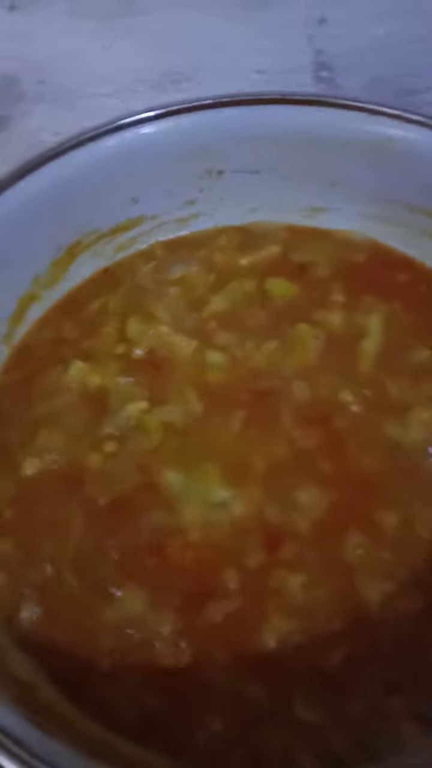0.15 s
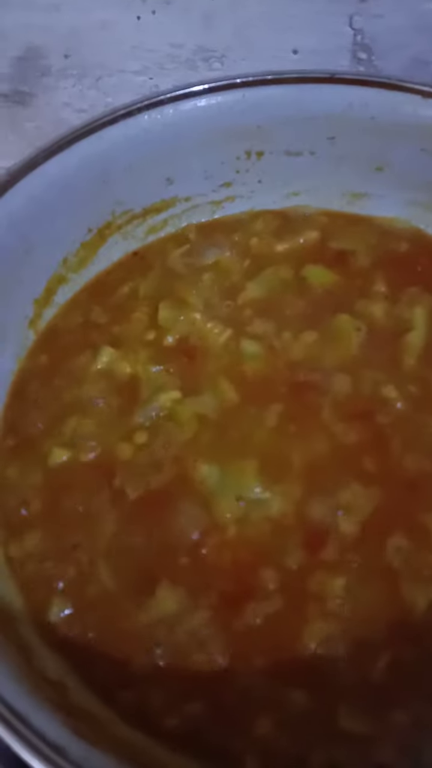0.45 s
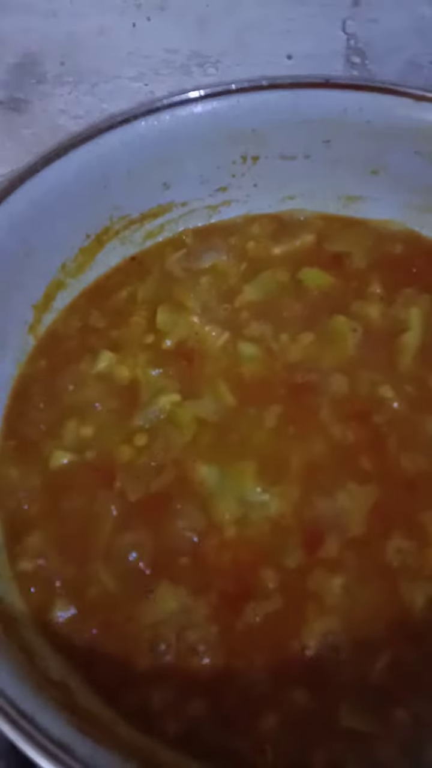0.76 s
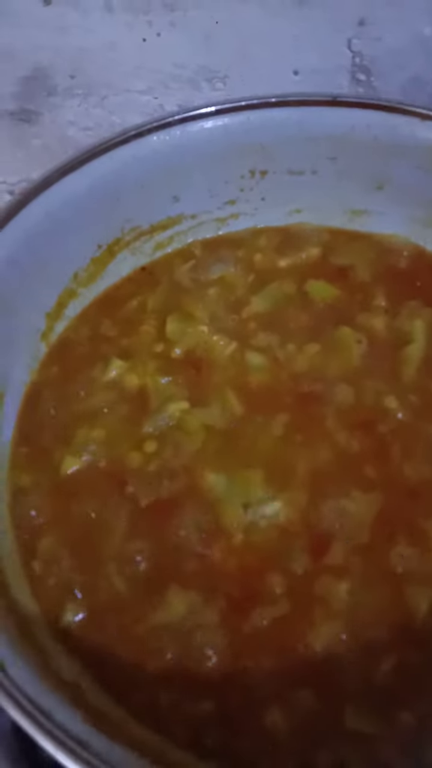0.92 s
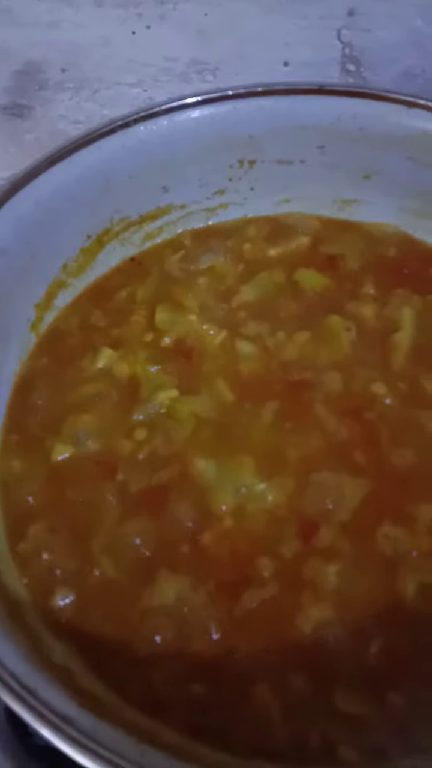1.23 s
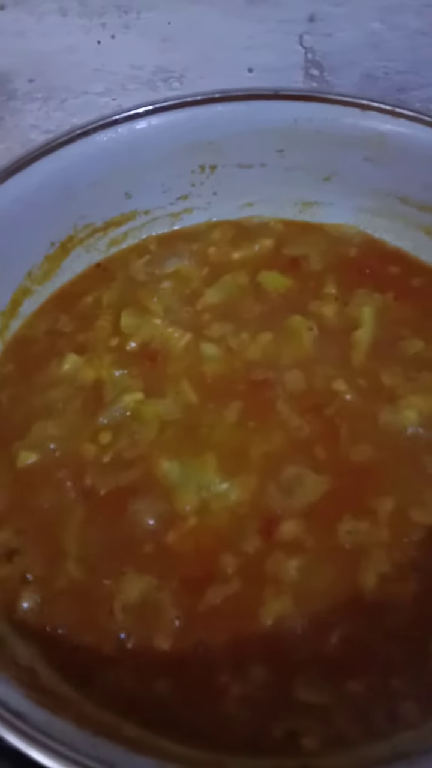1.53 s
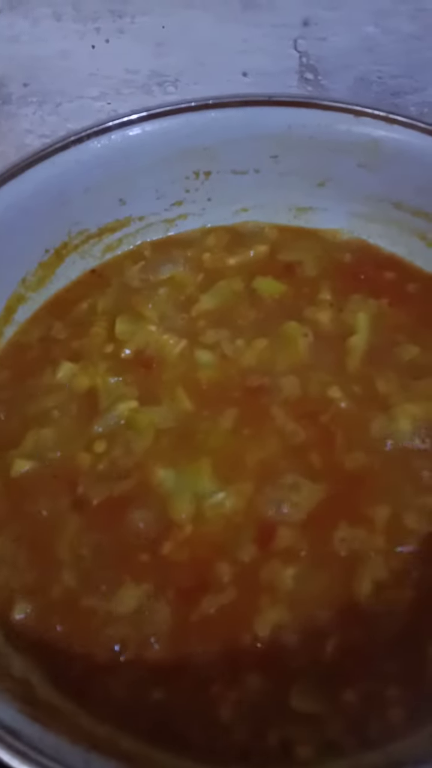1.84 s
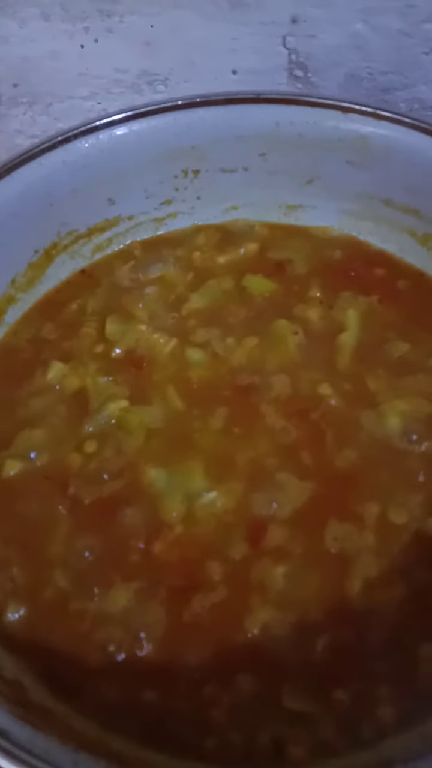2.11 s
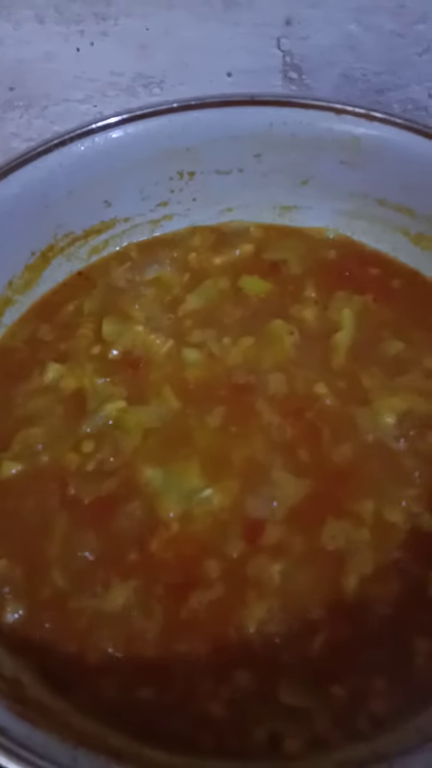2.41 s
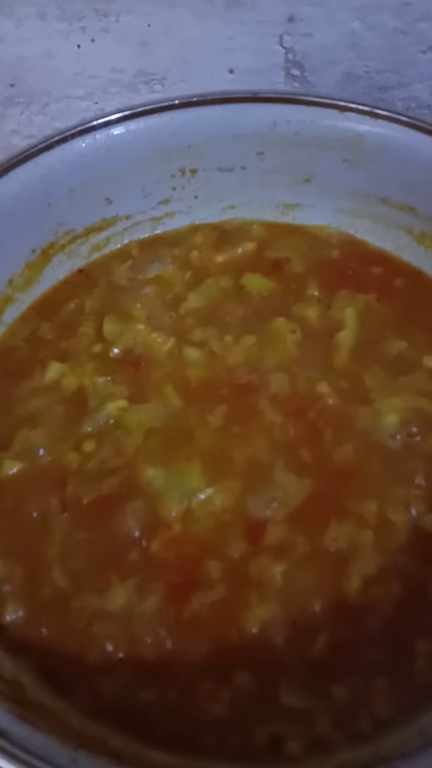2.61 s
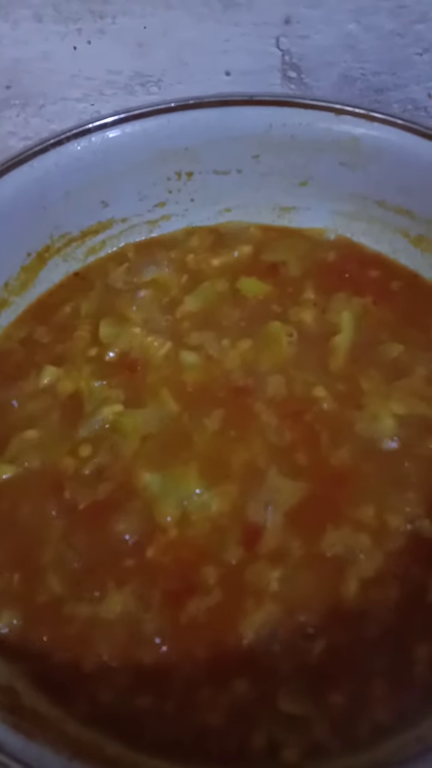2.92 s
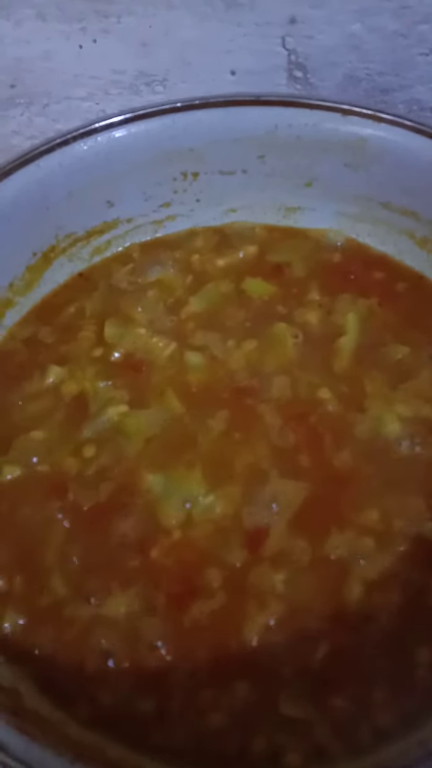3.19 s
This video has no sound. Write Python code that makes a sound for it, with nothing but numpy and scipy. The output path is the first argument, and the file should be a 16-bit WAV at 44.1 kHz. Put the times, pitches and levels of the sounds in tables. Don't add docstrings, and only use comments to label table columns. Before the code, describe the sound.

Thick curry simmers in a metal pan throughout, close to a small microphone. A steady, grainy, slightly ringing hiss sits over quiet flame and boiling rumble. Soft plops start at once; bubble pops cluster at 0.1-0.5 seconds, strongest near 0.3, then continue irregularly with deeper pops, steam spits and faint spray puffs. Tiny metal ticks come near 2.2, 2.3, 2.5 and 3.2, with thin rim squeaks around 2.2-2.5.

```python
import sys
import numpy as np
from scipy import signal
from scipy.fft import rfft, irfft, next_fast_len
from scipy.io import wavfile

SR = 44100
rng = np.random.default_rng(int(sys.argv[2]) if len(sys.argv) > 2 else 0)


def gain_from_decibels(decibels):
    exponent = np.asarray(decibels, float) / 20
    return 10 ** exponent


def store_wav(level_fs):
    pcm = np.round(np.clip(np.atleast_2d(level_fs), -1, 1) * 32767)
    wavfile.write(sys.argv[1], SR, pcm.T.astype(np.int16))


N = 147735

# [f/Hz, level per Hz/dB]
RUMBLE_COLOUR = [(26, -37), (45, 6), (129, -6.5), (183, -2.5), (253, -9.5), (348, -4), (900, -9.5),
                 (1050, -12), (1430, -27), (2420, -120)]
# [f/Hz, width/Hz, lift/dB]
HOLLOW_PEAKS = [(188.7, 20, 11), (232, 110, -4), (345, 34, 8), (398, 21, 5), (511, 23, 8), (650, 19.6, 10),
                (865, 360, 5)]
# [t/s, level/dB, f/Hz, length/s]
PLOPS = [(0.08, -62.5, 434, 0.058), (0.151, -57.5, 163, 0.03), (0.166, -49.5, 63, 0.063),
         (0.168, -62, 348, 0.038), (0.226, -63.0, 495.0, 0.033), (0.231, -58, 184, 0.059),
         (0.251, -58.5, 342, 0.093), (0.288, -59, 511, 0.025), (0.402, -63, 500.0, 0.033),
         (0.407, -60.5, 400.0, 0.025), (0.443, -62, 835, 0.03), (0.539, -64, 717, 0.032),
         (0.622, -56.5, 79.6, 0.056), (0.84, -59.5, 350.0, 0.035), (0.851, -62.5, 707, 0.065),
         (0.867, -62.0, 505, 0.1), (0.904, -67, 350.0, 0.022), (0.905, -56.5, 420, 0.033),
         (0.92, -65, 840, 0.04), (0.95, -62, 188, 0.056), (1.036, -64.0, 504, 0.051),
         (1.036, -56, 777, 0.022), (1.052, -58.5, 187, 0.063), (1.095, -57, 191, 0.019),
         (1.169, -54.5, 355, 0.027), (1.225, -57.0, 190, 0.073), (1.257, -57, 81.5, 0.071),
         (1.287, -67, 627, 0.11), (1.323, -60, 620, 0.028), (1.332, -67.5, 783, 0.073),
         (1.509, -61, 710, 0.033), (1.543, -58, 430, 0.033), (1.544, -55, 348, 0.025),
         (1.65, -67, 530, 0.058), (1.711, -67, 182, 0.038), (1.761, -64.0, 520.0, 0.046),
         (1.815, -60.5, 345.0, 0.046), (1.934, -60.5, 427, 0.041), (2.087, -57, 345.0, 0.05),
         (2.121, -63.5, 818, 0.087), (2.142, -63, 512, 0.04), (2.264, -64.0, 345.0, 0.06),
         (2.354, -58, 430.0, 0.033), (2.43, -65.5, 186, 0.059), (2.451, -63, 430.0, 0.029),
         (2.58, -61.5, 190, 0.055), (2.672, -55, 344, 0.049), (2.729, -66.0, 513, 0.064),
         (2.95, -68, 101, 0.025), (3.33, -61.5, 180, 0.032)]
# [t/s, peak level/dB, length/s]
SQUEAKS = [
    (2.2102, -47, 0.0033),
    (2.229, -51, .012),
    (2.296, -54, 0.004),
    (2.313, -45, .011),
    (2.478, -57, .012),
]
# [t/s, peak level/dB]
TICKS = [
    (2.215, -28.5),
    (2.309, -46),
    (2.4787, -52),
    (3.2379, -41.5),
]
# [f/Hz, level/dB, t60/s]
TICK_MODES = [(10050, -20, .025), (14210, -5, .03), (15350, -5, .02), (15700, -13, .02), (11400, -31, .02),
              (9300, -29, .03)]
# [t/s, peak level/dB, f/Hz]
POPS = [(0.1142, -28, 2470), (0.168, -38, 2530), (0.187, -27, 2430), (0.2144, -22.5, 2480),
        (0.2384, -38, 2460), (0.3186, -18, 2450), (0.431, -26, 2300), (0.4566, -23.5, 2440),
        (0.488, -28, 2600), (0.6928, -25.5, 2460), (0.889, -25, 2580), (0.928, -21.5, 2475),
        (1.0311, -27.5, 2400), (1.074, -30, 2386), (1.1536, -29, 2520), (1.2605, -28, 2530),
        (1.4553, -27, 2460), (1.506, -26.5, 2550), (1.5374, -29, 2240), (1.5832, -26.5, 2450),
        (1.66, -43, 2530), (1.733, -25, 2480), (1.8115, -27, 2350), (1.916, -27.5, 2390),
        (2.0094, -37, 2160), (2.0275, -30, 2320), (2.1212, -29, 2420), (2.1403, -26.5, 2510),
        (2.1814, -29.5, 2510), (2.2553, -27, 2380), (2.337, -30, 2500), (2.4855, -34, 2330),
        (2.5242, -29, 2440), (2.5963, -32.5, 2400), (2.72, -39, 2460), (2.7379, -24, 2450),
        (2.9367, -29, 2290), (3.053, -31, 2480), (3.079, -28.5, 2270), (3.1495, -26.5, 2530),
        (3.2266, -29, 2220), (3.3251, -29.5, 2536)]
# [t/s, peak level/dB, f/Hz]
DEEP_POPS = [(0.2432, -29.5, 1293), (0.342, -35.5, 1233), (0.833, -29.5, 1300), (0.9384, -31, 1273),
             (0.9604, -28.5, 1273), (1.1545, -30, 1280), (1.4225, -28.5, 1307), (1.5824, -30.5, 1270),
             (1.6995, -36, 1300), (2.1872, -34, 1270), (2.262, -36, 1270), (2.4036, -32, 1238),
             (2.4352, -35, 1300), (2.4837, -34, 1250), (2.833, -39, 1270), (2.922, -33.5, 1260),
             (3.0457, -31.5, 1338), (3.292, -40, 1250)]
# [t/s, peak level/dB, f/Hz]
CRACKLES = [
    (.0802, -44, 3540),
    (.3187, -38, 3220),
    (.328, -39, 3100),
]
# [t/s, pan level/dB, fizz level/dB]
HEAT = [
    (0.0, -39, -54),
    (0.45, -40.5, -52),
    (3.35, -41, -53),
]
# [t/s, level/dB]
FLURRIES = [(.116, -45.5), (.187, -43), (.24, -61), (0.388, -36.5), (.455, -40), (.49, -48), (.54, -43),
            (0.889, -42.5), (1.15, -60), (1.81, -41), (1.83, -52), (1.917, -39), (2.009, -38), (2.044, -45),
            (2.12, -45), (2.25, -48), (2.335, -40.5), (2.433, -40), (2.59, -43), (2.815, -42)]
# [t/s, peak level/dB]
SPITS = [(0.126, -40), (0.36, -40), (0.452, -33), (0.6688, -40.5), (0.8349, -39), (1.322, -42),
         (1.927, -40), (2.006, -40), (2.32, -40), (2.601, -39), (2.8902, -42)]
# [t/s, level/dB, length/s]
PUFFS = [
    (.462, -56, 0.022),
    (.63, -66, .015),
    (.745, -70, 0.028),
    (1.235, -67, .03),
    (1.535, -58, .03),
    (1.92, -59, 0.081),
    (3.27, -62, .02),
]
# [f/Hz, level per Hz/dB]
PAN_COLOUR = [(560, -53.5), (950, -40), (1100, -15), (1250, -5), (1730, -9.5), (2460, -1), (3050, -16.5),
              (3360, -25), (4000, -39.5), (5200, -64), (8800, -120)]
# [f/Hz, width/Hz, lift/dB]
PAN_PEAKS = [(1270, 150, 9.5), (1603, 15, 9), (1843, 63, 1.5), (1928, 200, 4.5), (2225, 38, 8),
             (2494, 155, 5.5), (3034, 152, 12), (3540, 49, 7)]
# [f/Hz, level per Hz/dB]
FIZZ_COLOUR = [(2180, -58), (3700, -23), (4670, -15), (5680, 0.5), (6570, 2.5), (7130, 4.5), (7600, -0.5),
               (9000, -19), (11000, -31), (14300, -64), (22000, -120)]
# [f/Hz, width/Hz, lift/dB]
FIZZ_PEAKS = [(4215, 110, 8), (5330, 300, 4), (6626, 130, -11), (10070, 61, 7.5)]
# [f/Hz, level per Hz/dB]
AIR_COLOUR = [(6180, -37), (10500, -29), (10900, -20), (13500, -21), (14900, -6.5), (15600, -6),
              (15900, -13)]
# [f/Hz, width/Hz, lift/dB]
AIR_PEAKS = [(14210, 120, 4), (15350, 150, 5), (15560, 60, -6), (10800, 600, -4)]

RUMBLE_DB, AIR_DB = -54, -71.5
PLOP_BEND_HZ_PER_S, PLOP_WOBBLE_DB, PLOP_WAVER_RAD = 350, 2.0, 0.6
SQUEAK_HZ = 15350
TICK_DELAY_S, TICK_CONTACT_S = 0.0003, 0.0009
POP_RISE_S, POP_FALL_CYCLES, POP_DB = 0.0015, 5.9, -4
POP_KNOCK_DB = -3
BURST_RISE_S, FLURRY_FALL_S = 0.003, 0.032
SPIT_FALL_S, SPIT_DB = 0.018, -7
LOW_CUT_HZ, HIGH_CUT_HZ = 79, 15680


def rms_one(x):
    return x / np.sqrt(np.mean(x ** 2) + 1e-20)


def drift(rate_hz):
    r = np.exp(-2 * np.pi * rate_hz / SR)
    slow = signal.lfilter([1], [1, -2 * r, r * r], rng.standard_normal(N + SR))
    return rms_one(slow[SR:])


def colour(x, spectrum, peaks):
    size = next_fast_len(N + SR // 2, real=True) // 2 * 2
    hz = np.maximum(np.arange(size // 2 + 1) * SR / size, 1)
    at, db = np.transpose(spectrum)
    db = np.interp(np.log(hz), np.log(at), db)
    outside = np.log(np.maximum(at[0] / hz, hz / at[-1]))
    db = db - 40 * np.clip(20 * outside, 0, 1)
    for peak_hz, width_hz, lift_db in peaks:
        db = db + lift_db / (1 + (2 * (hz - peak_hz) / width_hz) ** 2)
    gain = gain_from_decibels(db)
    cepstrum = irfft(np.log(gain / np.sqrt(np.mean(gain ** 2))), size)
    cepstrum[1:size // 2] *= 2
    cepstrum[size // 2 + 1:] = 0
    return irfft(rfft(x, size) * np.exp(rfft(cepstrum)), size)[:N]


def grains(rate, spread_db, share, flicker_db, flicker_hz):
    clumps = gain_from_decibels(flicker_db * drift(flicker_hz))
    sizes = gain_from_decibels(spread_db * np.minimum(rng.exponential(1, N), 5)) * rng.choice([-1, 1], N)
    clicks = rms_one(sizes * (rng.random(N) < rate / SR))
    smooth = rng.standard_normal(N)
    return rms_one(clumps * (share * clicks + np.sqrt(1 - share ** 2) * smooth))


def bubbles(rate, low_hz, high_hz, cycles, count):
    sizes = gain_from_decibels(2.56 * np.minimum(rng.exponential(1, N), 3)) * (rng.random(N) < rate / SR)
    dealt = rng.integers(0, count, N)
    out = 0
    for k, hz in enumerate(np.geomspace(low_hz, high_hz, count)):
        r, w = gain_from_decibels(-60 * hz / (cycles * SR)), 2 * np.pi * hz / SR
        pole = [1, 0, -1, 1, -2 * r * np.cos(w), r * r]
        ring = signal.sosfilt([pole, pole], sizes * (dealt == k) + 1e-18)
        out = out + np.sqrt(hz) * rms_one(ring)
    return rms_one(out) * np.sqrt(2 * (high_hz - low_hz) / SR)


def strikes(s, db):
    out = np.zeros(N)
    out[(np.asarray(s) * SR).astype(int)] = gain_from_decibels(db)
    return out


def swells(rows):
    t = np.arange(N) / SR
    return [gain_from_decibels(db) * np.exp(-(2 * (t - s) / length) ** 2) for s, db, length in rows]


def bursts(s, db, fall_s):
    rise, fall = np.exp(-1 / (BURST_RISE_S * SR)), np.exp(-1 / (fall_s * SR))
    stages = [[1, 0, 0, 1, -fall, 0], [1 - rise, 0, 0, 1, -rise, 0]]
    return signal.sosfilt(stages, strikes(s, db) + 1e-18)


def rumble():
    lumps = gain_from_decibels(-3.0) * grains(120, 3.5, 0.2, 1.8, 8.0)
    blurps = gain_from_decibels(-7.0) * bubbles(260, 60, 1100, 14, count=26)
    return gain_from_decibels(RUMBLE_DB - 1.2) * colour(lumps + blurps, RUMBLE_COLOUR, HOLLOW_PEAKS)


def plops():
    t = np.arange(N) / SR
    bells = swells([(s, db + 7.5, length) for s, db, _, length in PLOPS])
    bends = PLOP_BEND_HZ_PER_S * rng.standard_normal(len(PLOPS))
    waver = PLOP_WAVER_RAD * drift(24)
    tones = np.zeros(N)
    for bell, bend, (s, _, hz, _) in zip(bells, bends, PLOPS):
        phase = 2 * np.pi * (t - s) * (hz + bend * (t - s) / 2)
        tones += bell * np.sin(phase + waver)
    return tones * gain_from_decibels(PLOP_WOBBLE_DB * drift(24))


def squeaks():
    return sum(swells(SQUEAKS)) * np.sin(2 * np.pi * SQUEAK_HZ * np.arange(N) / SR)


def ticks():
    s, db = np.transpose(TICKS)
    contact = np.exp(-1 / (TICK_CONTACT_S * SR))
    out = np.zeros(N)
    for hz, level_db, t60 in TICK_MODES:
        w, ring = 2 * np.pi * hz / SR, gain_from_decibels(-60 / (t60 * SR))
        poles = [[np.sin(w), 0, 0, 1, -2 * r * np.cos(w), r * r] for r in (ring, contact)]
        hits = strikes(s + TICK_DELAY_S, db + level_db) + 1e-18
        out += 2 * (1 - contact) * signal.sosfilt(poles, hits)
    return out


def pops():
    out, t = np.zeros(N + SR), np.arange(1500) / SR
    for s, db, hz in [*POPS, *DEEP_POPS, *CRACKLES]:
        shape = (1 - np.exp(-(t / POP_RISE_S) ** 2)) * np.exp(-t * hz / POP_FALL_CYCLES)
        i = int(s * SR)
        out[i:i + len(t)] += gain_from_decibels(db + POP_DB) * shape / shape.max() * np.sin(2 * np.pi * hz * t)
    return out[:N]


def spray(swell):
    mist = gain_from_decibels(AIR_DB + 3.0 + 1.1 * swell) * grains(1500, 3.4, 0.5, 1.9, 25)
    puffs = sum(swells(PUFFS)) * rng.standard_normal(N)
    return colour(mist + puffs, AIR_COLOUR, AIR_PEAKS)


def surface_fizz(level_db, swell):
    fine = gain_from_decibels(-1.5) * grains(2500, 6.0, 0.21, 1.18, 7.3)
    rings = gain_from_decibels(-4.5) * bubbles(350, 3433, 10920, 62, count=24)
    high_rings = gain_from_decibels(-5.5 + 4.65 * drift(7.8)) * bubbles(300, 7755, 10420, 67, count=8)
    fizz = gain_from_decibels(level_db - 0.5 + 1.3 * swell) * (fine + rings + high_rings)
    s, db = np.transpose(SPITS)
    spits = bursts(s, db + SPIT_DB, SPIT_FALL_S) * rng.standard_normal(N)
    return colour(fizz + spits, FIZZ_COLOUR, FIZZ_PEAKS)


def pan_hiss(level_db, swell):
    flurries = bursts(*np.transpose(FLURRIES), FLURRY_FALL_S)
    vigour = np.hypot(gain_from_decibels(level_db - 1.3 + 0.75 * swell), flurries)
    fine = gain_from_decibels(-0.5) * grains(1200, 4.3, 0.27, 1.0, 52)
    rings = gain_from_decibels(-6.0) * bubbles(700, 1055, 3980, 16, count=20)
    s, db, _ = np.transpose(POPS)
    knocks = strikes(s, db + POP_KNOCK_DB)
    return colour(vigour * (fine + rings) + knocks, PAN_COLOUR, PAN_PEAKS)


def simmer():
    s, pan_db, fizz_db = np.transpose(HEAT)
    t, swell = np.arange(N) / SR, drift(18.0)
    fizz = surface_fizz(np.interp(t, s, fizz_db), swell)
    pan = pan_hiss(np.interp(t, s, pan_db), swell)
    return spray(swell) + fizz + pan


def scene():
    return (rumble() + plops() + squeaks() + ticks() + pops() + simmer())[None]


def roll_off(x):
    return signal.sosfilt(signal.butter(12, 16690, fs=SR, output="sos"), x)


def record(dry):
    top_cut = signal.ellip(12, 0.3, 70, HIGH_CUT_HZ, fs=SR, output="sos")
    low_cut = signal.butter(4, LOW_CUT_HZ, "high", fs=SR, output="sos")
    mix = signal.sosfilt(low_cut, signal.sosfilt(top_cut, dry)) + gain_from_decibels(-90) * drift(13)
    return roll_off(mix)


dry = scene()
out = record(dry)
store_wav(out)
```